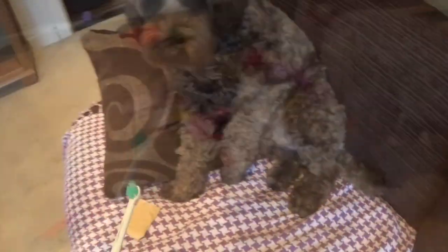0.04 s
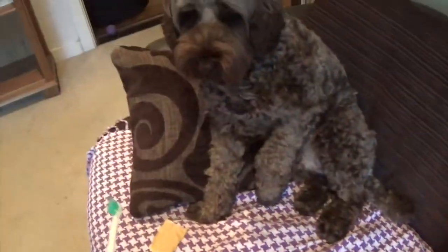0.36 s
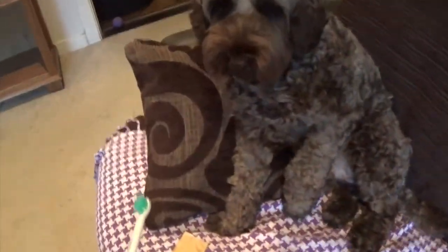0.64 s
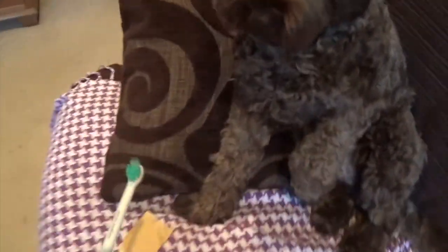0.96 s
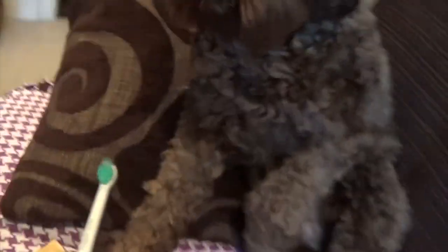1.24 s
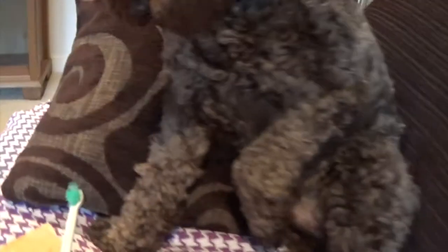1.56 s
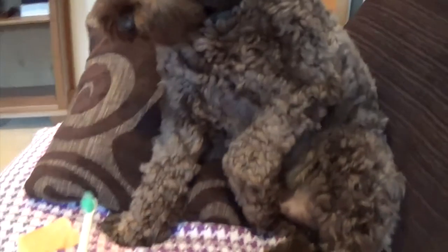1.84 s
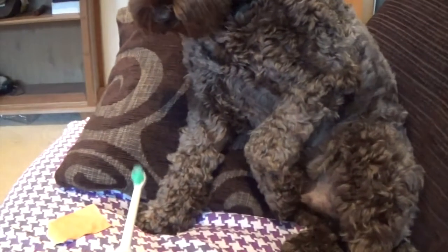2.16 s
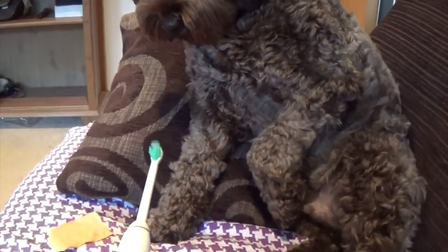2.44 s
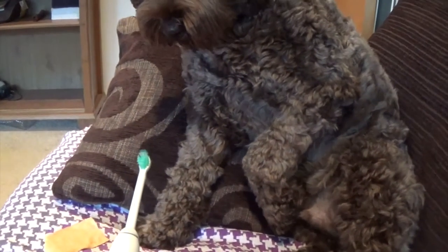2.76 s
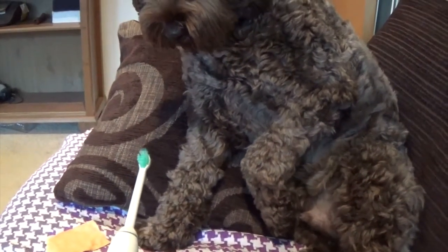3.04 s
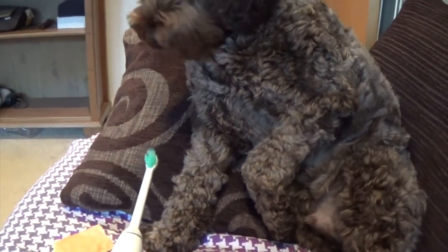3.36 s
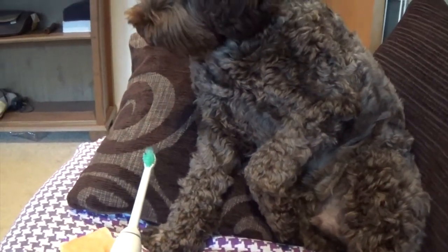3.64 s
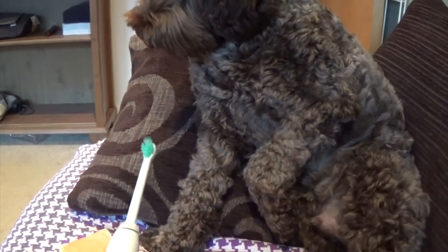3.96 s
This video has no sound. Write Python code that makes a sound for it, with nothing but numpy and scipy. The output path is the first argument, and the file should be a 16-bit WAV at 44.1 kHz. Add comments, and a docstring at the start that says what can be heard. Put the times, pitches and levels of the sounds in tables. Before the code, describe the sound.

Steady, bright buzz of a running electric toothbrush indoors, its tone shifting as it moves.

```python
"""A quiet, carpeted living room, where a sonic electric toothbrush buzzes in a hand reaching out to a dog.
The drive snaps once a cycle, about 248 times a second: a stack of harmonics with a faint pulsing hiss.
Its colour shifts as the hand turns it and moves it among nearby surfaces, and settles as the hand slows.
Around it lie one faint tap, a few soft handling bumps, cloth rustles, a grip slide and low room tone."""
import sys
import numpy as np
from scipy.fft import rfft, irfft, next_fast_len
from scipy.io import wavfile
from scipy.ndimage import map_coordinates

SR = 44100
rng = np.random.default_rng(int(sys.argv[2]) if len(sys.argv) > 2 else 0)


def wav_out(sig):
    """Save sig, one row per channel (or a flat mono array), as 16-bit PCM at SR to the path in sys.argv[1]."""
    wavfile.write(sys.argv[1], SR, np.round(np.clip(np.atleast_2d(sig).T, -1, 1) * 32767).astype(np.int16))


N = 176400

# EQ curves for the noise layers. Each row: frequency in Hz, relative level in dB.
ROOM_EQ = [(20, -7), (48, 1), (150, -6.5), (300, -5.5), (600, -12), (15000, -35)]
BUMP_EQ = [(20, -16), (60, 2), (220, -5), (500, -20), (2000, -27)]
RUSTLE_EQ = [(60, -16), (350, -3), (800, -7.5), (3500, -12.5), (10000, -38)]
SLIDE_EQ = [(500, -17), (2200, -5), (3500, -2), (12000, -27.5)]
TAP_EQ = [(200, -11), (750, 4.5), (1300, -1), (3400, 1.5), (7200, -2.5), (14000, -24)]
HISS_EQ = [(1200, -17), (2400, -1.5), (4000, -1.5), (5000, -3.5), (7500, -5.5), (9400, 2.5), (11500, -1.5),
           (15000, -13)]
# Handling cues. Each row: centre in seconds, width in seconds, level at the crest in dB.
BUMP_CUES = [(0.12, 0.13, -72), (.4, 0.43, -76.5), (1.295, 0.069, -63.5), (1.425, 0.089, -69),
             (1.763, 0.025, -63.5)]
RUSTLE_CUES = [(0.705, 0.27, -71), (1.317, 0.15, -74), (1.57, 0.16, -70.5), (1.85, 0.29, -74.5)]
SLIDE_CUES = [(0.967, .07, -66)]

# The arm's gesture. Each row: time in seconds, reach from 0 (at rest) to 1 (held out).
HAND_REACH = [(0, 0.5), (.25, 0.52), (.6, .92), (1.7, 0.6), (2.1, 0.42), (2.35, 0.02), (4, 0.13)]
# The hand's pace. Each row: time in seconds, relative speed.
HAND_PACE = [(0, .85), (1.5, 1.05), (2.1, .6), (2.8, .24), (3.5, .16), (4, .45)]
# The buzz's pitch, nudged slightly as the hand moves. Each row: time in seconds, snap rate as heard in Hz.
HEARD_RATE = [(1.35, 248.11), (1.55, 247.92), (1.9, 248.02)]
# The buzz's timbre at rest, then its low end held out. Each entry: a harmonic's relative level in dB.
REST_TIMBRE = [-71, -78, -62, -84, -67, -63, -55, -67, -53, -52, -58, -62, -65, -64, -72, -50, -67, -70,
               -62, -67, -69, -61, -61, -62, -67, -65, -70, -59, -70, -71, -76, -64, -72, -62, -59, -69,
               -56, -61, -59, -63, -66, -71, -68, -77, -70, -76, -72, -75, -70, -71, -70, -67, -72, -70,
               -81, -80, -83, -89, -86, -86, -84, -90]
REACHED_TIMBRE = [-67, -75, -63, -73.5, -67, -53, -53, -55, -58, -54, -56, -61, -57, -58, -59, -55, -67,
                  -63, -67, -71]
# EQ on the remaining harmonics at full reach. Each row: frequency in Hz, gain in dB.
REACHED_EQ = [(5200, -3), (5450, 0), (5900, -6), (6200, 0), (6950, -9), (7400, 1), (9000, -4), (10900, -1),
              (11150, -10), (15000, -7)]
# Two resonances that sweep as the brush turns. Each row: time in seconds, centre in Hz.
NASAL_SWEEP = [(.1, 2500), (.55, 2350), (.7, 1950), (1.12, 1850), (1.4, 1480), (1.55, 1850), (1.95, 1750),
               (2.15, 2350)]
RASP_SWEEP = [(.12, 3520), (.3, 3780), (.55, 3850), (.75, 3500), (.95, 3480), (1.1, 3240), (1.25, 3250),
              (1.38, 2900), (1.55, 3280), (2.2, 3200), (2.4, 3480)]
# Band faders for the buzz, low to high. Each row: time in seconds, level in dB.
HUM_FADER = [(0, -66.5), (1.2, -66), (2.5, -71)]
LOW_FADER = [(0, -63), (.2, -70.5), (.55, -67.5), (1.3, -59.5), (2, -61), (4, -60.5)]
BODY_FADER = [(0, -49.5), (.13, -45), (.75, -46), (1.05, -47.5), (1.75, -47), (2.17, -44.5), (2.45, -48),
              (3.1, -45)]
RASP_FADER = [(.05, -47.5), (.25, -50.5), (.62, -52.5), (.77, -56), (.92, -50), (1.25, -49.5),
              (1.42, -46.5), (1.68, -52.5), (2.3, -52.5), (4, -54.5)]
SHRILL_FADER = [(0, -47.5), (.1, -54), (.2, -60.5), (.6, -64), (.72, -53.5), (1, -50), (1.43, -52.5),
                (1.62, -59.5), (2.11, -62), (2.2, -50), (3.4, -49.5), (4, -54.5)]
WHINE_FADER = [(0, -57), (.65, -57), (.92, -54.5), (1.5, -52.5), (1.9, -58.5), (2.2, -54), (3.4, -51.5),
               (4, -52.5)]
TREBLE_FADER = [(0, -56), (.65, -55.5), (1.48, -51.5), (1.7, -53.5), (2.05, -50)]
# The limits of those seven bands. Each entry: an edge in Hz.
BAND_EDGES = [0, 400, 1350, 2600, 3850, 4100, 8000, 16000]
# When each part of a snap arrives. Each row: frequency in Hz, delay in seconds.
SNAP_ARRIVAL = [(250, .0016), (1500, .001), (2500, .00045), (4000, -.0007), (5500, .0004), (9000, 0),
                (15000, .0002)]
# Smear of the snap. Each row: frequency in Hz, phase scatter in radians.
SNAP_SMEAR = [(2500, 0.48), (4000, 1), (9000, 0.43), (15000, 1)]
# Bounce off nearby surfaces. Each row: frequency in Hz, reflected share at a hand speed of 1.
SURFACE_BOUNCE = [(750, .07), (1500, .22), (2400, .3), (3200, .45), (7500, .52), (9300, .33)]
# The buzz's stereo placement. Each row: frequency in Hz, left minus right in dB.
BUZZ_PAN = [(750, .4), (1240, 3), (1740, 2.5), (1984, 8), (2240, 4.5), (2600, 2.5), (3200, 3.5), (3600, -1),
            (4000, 2), (6900, 3.5), (8500, 0)]


def amp(db):
    """Decibels to gain."""
    return 10 ** (np.asarray(db) / 20)


def along(points, hz):
    """Read a frequency curve on a log axis."""
    freqs, values = np.transpose(points)
    return np.interp(np.log(hz + 1), np.log(freqs + 1), values)


def curve(rows, t):
    """Read an automation lane, with straight ramps between its points."""
    return np.interp(t, *np.transpose(rows))


def glide(knots, position):
    """Move smoothly through a row of values."""
    return map_coordinates(knots, [position], mode="mirror")


def filtered(x, response):
    """EQ a signal with a gain that depends on frequency."""
    size = next_fast_len(N + SR // 2)
    return irfft(rfft(x, size) * response(np.fft.rfftfreq(size, 1 / SR)), size)[..., :N]


def noise(eq, side_db):
    """Coloured stereo noise with a mid of rms 1; side_db sets the width."""
    mid, side = filtered(rng.standard_normal((2, N)), lambda hz: amp(along(eq, hz)))
    side = side * amp(side_db)
    return np.array([mid + side, mid - side]) / mid.std()


def room_tone(level_db=-78):
    """The bed: a steady, faint rumble."""
    return amp(level_db) * noise(ROOM_EQ, side_db=-14.5)


def handling(t):
    """Soft swells of noise: the hand bumps dully, cloth rustles, the grip slides on the handle."""
    out = np.zeros((2, N))
    for cues, eq in ((BUMP_CUES, BUMP_EQ), (RUSTLE_CUES, RUSTLE_EQ), (SLIDE_CUES, SLIDE_EQ)):
        swells = sum(amp(db) * np.exp(-2 * ((t - centre) / width) ** 2) for centre, width, db in cues)
        out += swells * noise(eq, side_db=-23)
    return out


def tap(t, start_s=1.4655, attack_s=.0006, tick_hz=7150):
    """A small hard contact: a bright tick, a short clack and the room's tail."""
    age = np.maximum(t - start_s, 0)
    fade = lambda t60_s: amp(-60 * age / t60_s)
    room_tail = amp(-23) * fade(t60_s=.3)
    clack = amp(-43.2) * noise(TAP_EQ, side_db=-6) * (fade(t60_s=.028) + room_tail)
    tick = amp(-35) * np.sin(2 * np.pi * tick_hz * age) * fade(t60_s=.013)
    return (clack + tick) * (1 - np.exp(-age / attack_s))


def reflections(t, hz):
    """Nearby surfaces boost or cancel each harmonic, faster and deeper as the hand speeds up."""
    speed = curve(HAND_PACE, t)
    travel = np.cumsum(speed) * t[1]
    knots = rng.standard_normal((len(hz), 2, 64))
    rates = 7 * (hz / 2000) ** .45  # high harmonics drift fastest
    echo = np.array([glide(real, travel * rate) + 1j * glide(imag, travel * rate)
                     for (real, imag), rate in zip(knots, rates)])
    return 1 + along(SURFACE_BOUNCE, hz)[:, None] * np.sqrt(speed) * echo


def flutter(t, hz, rate_per_s=30):
    """Each harmonic's gain wavers on its own, most in the treble and while the hand moves."""
    knots = rng.standard_normal((len(hz), 256))
    waver = np.array([glide(row, t * rate_per_s) for row in knots])
    depth_db = 1.6 * np.sqrt(hz[:, None] / hz[-1] * curve(HAND_PACE, t))
    return amp(depth_db * waver)


def harmonics(t, hz, resonance_width_hz=193):
    """Each harmonic's gain and phase, shaped by reach, resonances, reflections and the band faders."""
    reach = curve(HAND_REACH, t)
    reached_upper = (REST_TIMBRE + along(REACHED_EQ, hz))[len(REACHED_TIMBRE):]
    db = np.outer(REST_TIMBRE, 1 - reach) + np.outer(np.r_[REACHED_TIMBRE, reached_upper], reach)
    for sweep, lift_db in ((NASAL_SWEEP, 4.5), (RASP_SWEEP, 6.5)):
        db += lift_db * np.exp(-.5 * ((hz[:, None] - curve(sweep, t)) / resonance_width_hz) ** 2)
    phase = -2 * np.pi * hz[0] * np.cumsum(along(SNAP_ARRIVAL, hz))
    phase += along(SNAP_SMEAR, hz) * rng.standard_normal(len(hz))
    gains = amp(db) * np.exp(1j * phase[:, None]) * reflections(t, hz)
    faders = HUM_FADER, LOW_FADER, BODY_FADER, RASP_FADER, SHRILL_FADER, WHINE_FADER, TREBLE_FADER
    for low, high, fader in zip(BAND_EDGES, BAND_EDGES[1:], faders):
        band = (hz >= low) & (hz < high)
        gains[band] *= amp(curve(fader, t)) / np.linalg.norm(gains[band], axis=0)
    return gains * flutter(t, hz)


def toothbrush(t, stereo_scatter_rad=.25, hiss_pulse_depth=.73, reach_pan_db=1.1):
    """The drive snaps once a cycle: a stack of clean harmonics, with a faint hiss pulsing in step."""
    pitch = curve(HEARD_RATE, t)
    cycle = np.exp(2j * np.pi * np.cumsum(pitch) / SR)
    hz = pitch.mean() * np.arange(1, len(REST_TIMBRE) + 1)
    control_t = t[::200]
    leads = stereo_scatter_rad * rng.standard_normal(len(hz))
    swings = .3 * (reflections(control_t, hz) - 1)  # each side meets slightly different reflections
    left_right = np.array([[.5], [-.5]])
    buzz, carrier = np.zeros((2, N)), np.ones(N, complex)
    for gain, pan_db, lead, swing in zip(harmonics(control_t, hz), along(BUZZ_PAN, hz), leads, swings):
        carrier = carrier * cycle  # step up one harmonic
        sides = amp(left_right * pan_db) * np.exp(left_right * (1j * lead + swing))
        sides /= sides.mean(axis=0)
        for channel, side in zip(buzz, sides):
            channel += np.sqrt(2) * (np.interp(t, control_t, gain * side) * carrier).real
    hiss = amp(curve(WHINE_FADER, t) - 13.5) * noise(HISS_EQ, side_db=-55)
    hiss *= 1 + hiss_pulse_depth * cycle.real
    return (buzz + hiss) * amp(left_right * reach_pan_db * curve(HAND_REACH, t))


def scene():
    """The mix: the brush up front, with handling, the tap and room tone beneath."""
    t = np.arange(N) / SR
    return handling(t) + toothbrush(t) + tap(t) + room_tone()


def record(dry):
    """A brick-wall high cut on the whole mix."""
    return filtered(dry, lambda hz: hz < 15650)


dry = scene()
out = record(dry)
wav_out(out)
```